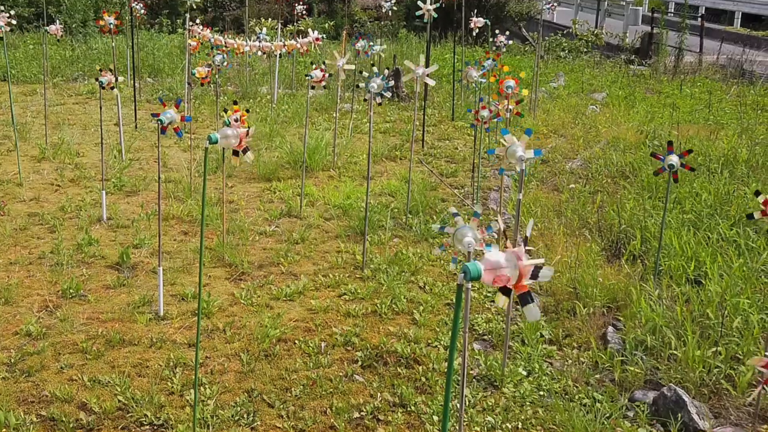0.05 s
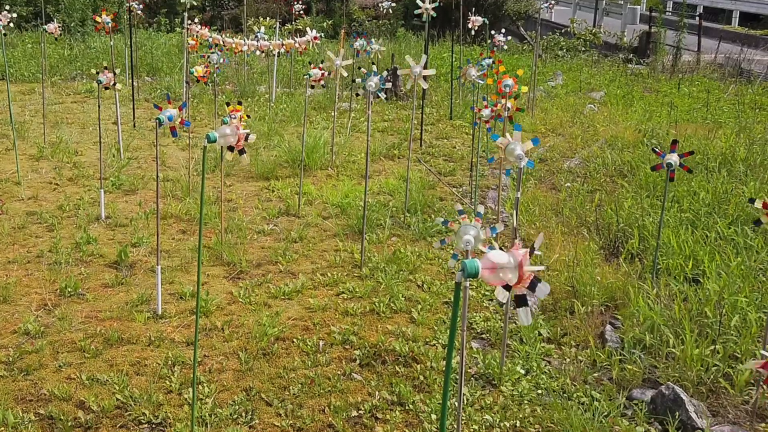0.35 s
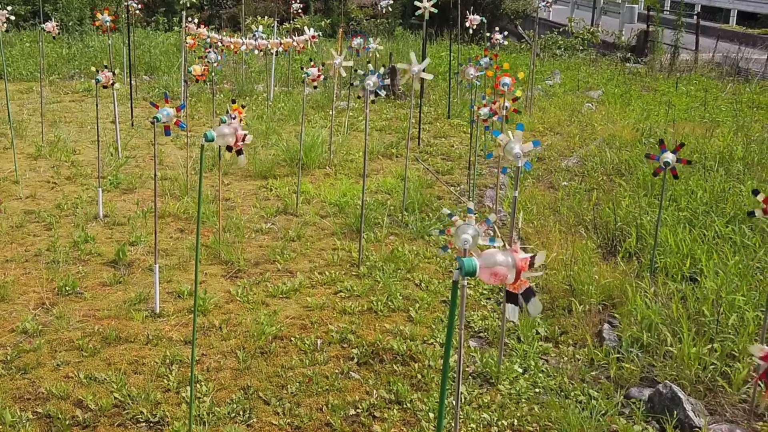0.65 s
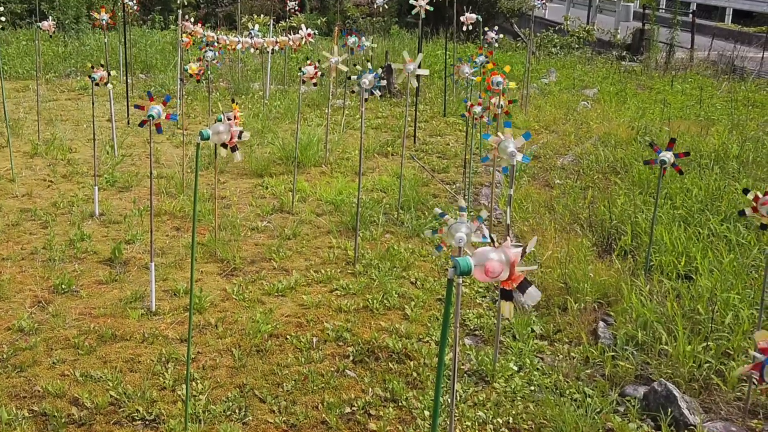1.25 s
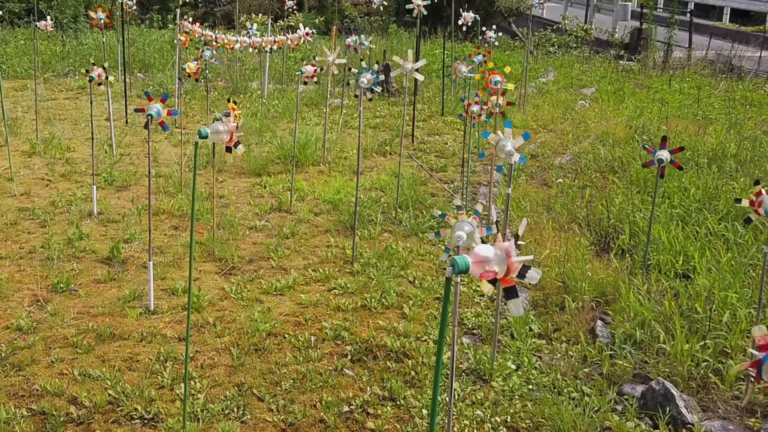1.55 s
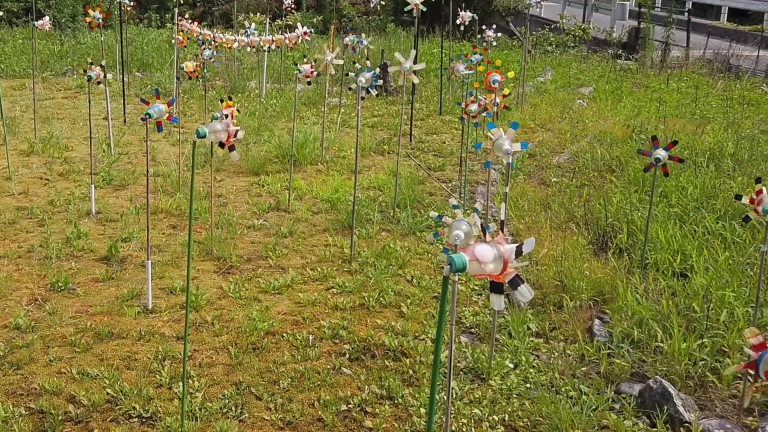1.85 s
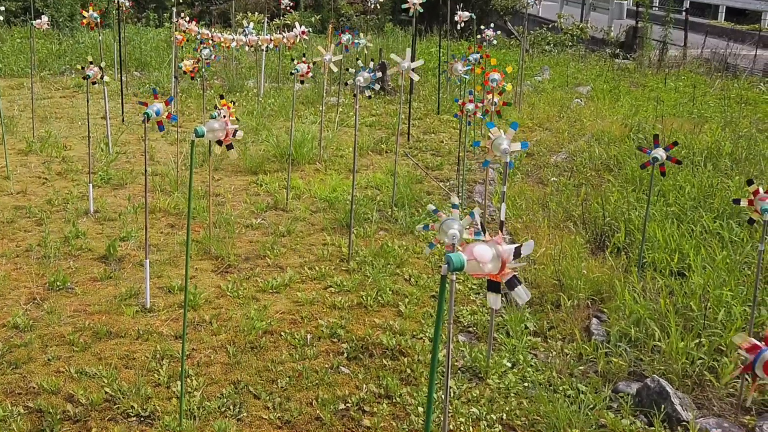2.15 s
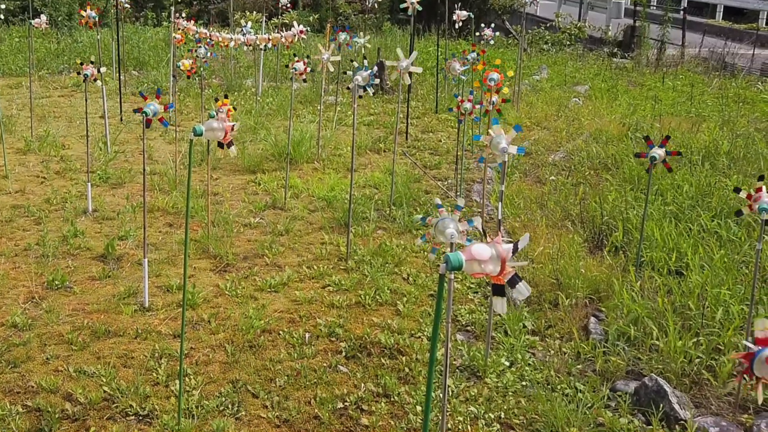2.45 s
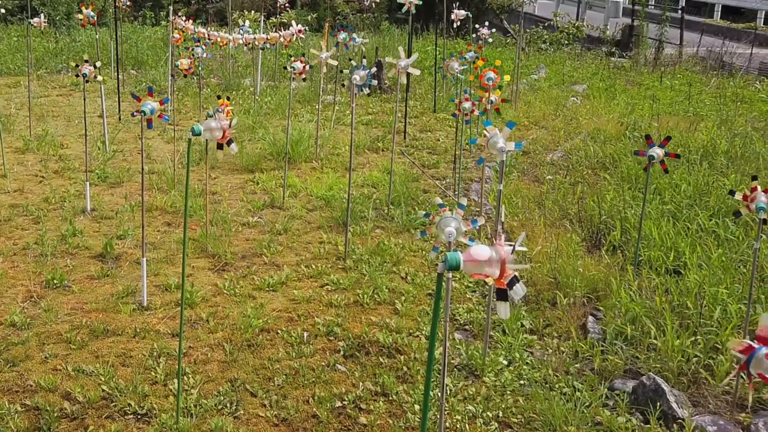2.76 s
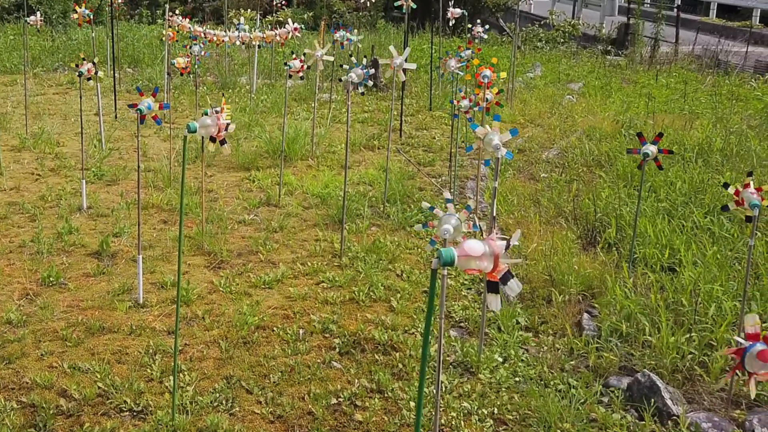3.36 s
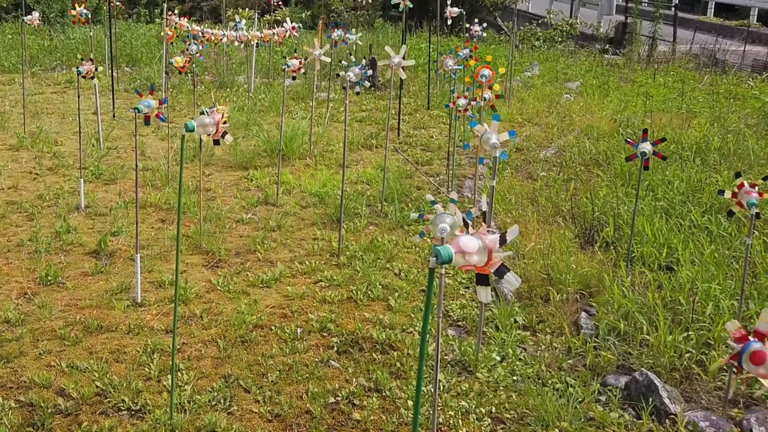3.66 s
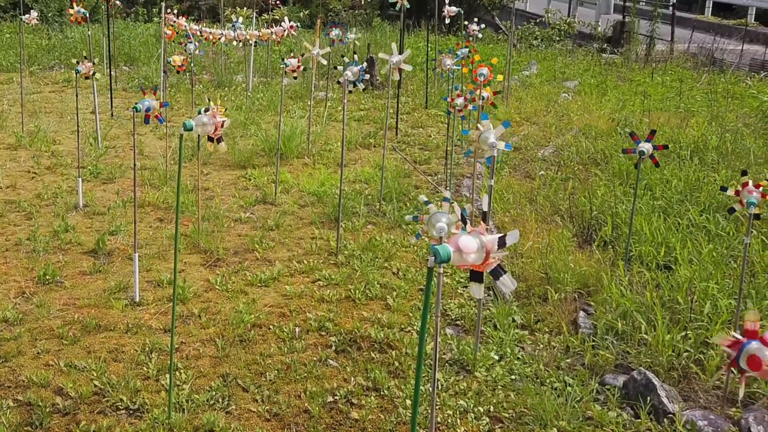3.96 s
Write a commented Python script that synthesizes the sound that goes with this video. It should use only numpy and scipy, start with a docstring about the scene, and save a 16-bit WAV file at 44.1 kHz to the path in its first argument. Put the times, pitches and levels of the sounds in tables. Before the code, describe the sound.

A plastic pinwheel squeaks close by, its dry hub giving short, irregular chirps and light knocks. Farther wheels tick and rustle across an open field, insects shrill steadily, and soft gusts rumble on the microphone.

```python
"""A plastic pinwheel turns in a light wind in an open field. Its dry hub knocks on its pin, then sticks
and slips, chirping low or squealing higher and breaking into the octave. Farther wheels tick, peep and
rustle, insects shrill in the grass, a low hum comes and goes, and gusts buffet the microphone."""
import sys
import numpy as np
from scipy import signal
from scipy.fft import rfft, irfft
from scipy.io import wavfile
from scipy.ndimage import uniform_filter1d

SR = 44100
rng = np.random.default_rng(int(sys.argv[2]) if len(sys.argv) > 2 else 0)


def store_wav(level_fs):
    """Save 16-bit WAV to argv[1]."""
    pcm = np.round(np.clip(np.atleast_2d(level_fs), -1, 1) * 32767)
    wavfile.write(sys.argv[1], SR, pcm.T.astype(np.int16))


N = 176400
TIME, FREQS = np.arange(N) / SR, np.fft.rfftfreq(N, 1 / SR)


def amp(db):
    return 10 ** (np.asarray(db) / 20)


def unit_rms(x):
    return x / np.sqrt(np.mean(x ** 2) + 1e-20)


def automation(points):
    """A fader ride: straight lines between points in time."""
    return np.interp(TIME, *np.transpose(points))


def over_spectrum(points):
    """Points joined on a log-frequency axis."""
    hz, value = np.transpose(points)
    return np.interp(np.log(FREQS + 1), np.log(hz), value)


def place(mix, start_s, sound):
    part = mix[max(round(start_s * SR), 0):][:len(sound)]
    part += sound[:len(part)]


def wander(rate_hz):
    """Smooth random modulation, rolling off above rate_hz."""
    return unit_rms(irfft(rfft(rng.standard_normal(N)) * np.exp(-(FREQS / rate_hz) ** 2), N))


# likeness of left and right: freq_hz, coherence
STEREO_IMAGE = [(30, 0.51), (120, 0.81), (250, 1), (500, 0.93), (1000, 1), (2000, 0.49), (4000, 0.036),
                (8000, 0.038), (15000, 0.067)]
def widen(mid, side):
    """Two channels, alike in the low mids and unrelated in the treble."""
    coherence = np.clip(over_spectrum(STEREO_IMAGE), -1, 1)
    mid = rfft(mid) * np.sqrt((1 + coherence) / 2)
    side = rfft(side) * np.sqrt((1 - coherence) / 2)
    return irfft(np.array([mid + side, mid - side]), N)


def noise_bed(colour, patchy_db):
    """Coloured stereo noise whose bands drift in level by about patchy_db."""
    bands = signal.stft(rng.standard_normal((2, N)), SR, nperseg=512)[2]
    patches = uniform_filter1d(rng.standard_normal(bands.shape[1:]), size=5, axis=0)
    patches = unit_rms(uniform_filter1d(patches, size=9, axis=1))
    white = signal.istft(bands * amp(patchy_db * patches), SR)[1][:, :N]
    coloured = irfft(rfft(white) * amp(over_spectrum(colour)), N)
    return unit_rms(widen(*coloured))


# colour of the open air: freq_hz, gain_db
AIR_EQ = [(20, 4), (60, -1), (150, -8), (300, -6.5), (420, -8), (560, -10.5), (780, -1), (1000, -0.5),
          (1300, -8.5), (1700, -8.5), (2600, -15.5), (5000, -23), (15000, -40)]
def air():
    """A soft, steady wash under everything."""
    return amp(-49) * noise_bed(AIR_EQ, patchy_db=1.4)


# swells of the hum: start_s, end_s, pitch_hz, level_db
HUM_SWELLS = [(0, 0.717, 118, -42.5), (0, 0.722, 233.5, -49.5), (2.398, 3.907, 118.2, -48),
              (3.404, 4.3, 60.9, -50.5)]
def hum(waver=.0051, flutter_db=3.8):
    """A low, slightly wavering hum swells and fades."""
    out = np.zeros(N)
    for start, end, hz, db in HUM_SWELLS:
        swell = np.sin(np.pi * np.clip((TIME - start) / (end - start), 0, 1))
        gain = amp(db + flutter_db * wander(14))
        pitch_hz = hz * (1 + waver * wander(4.05))
        out += gain * swell * np.sin(2 * np.pi * np.cumsum(pitch_hz) / SR)
    return out


# colours of the chorus and of its thin top: freq_hz, gain_db
CHORUS_EQ = [(4800, -27), (5900, -7), (6700, -9.5), (7500, -1.5), (8400, 3), (9200, -1.5), (9900, -9),
             (10700, -30), (12000, -38)]
SIZZLE_EQ = [(10000, -25), (12000, -1), (14200, 1), (15000, -2), (15400, -3)]
# fader rides for those two: time_s, gain_db
CHORUS_RIDE = [(0.0, -49.5), (1.15, -48), (2.2, -48.5), (4.0, -49.5)]
SIZZLE_RIDE = [(0, -78), (1.8, -72), (2.8, -62.5), (4, -61)]
# single insects holding a note: start_s, end_s, pitch_hz, width_hz, level_db
INSECT_NOTES = [(.22, 1.6, 8912, 20, -55), (.2, 1.4, 9358, 35, -60.5), (.6, 1.55, 9690, 20, -64.5),
                (.6, 1.55, 9810, 20, -63), (-.3, 2.1, 6070, 110, -62.5), (2.5, 3.72, 5814, 20, -62.5),
                (3.35, 4.2, 7850, 200, -58), (2.3, 4.3, 14080, 100, -78)]
def insects(sag_hz_per_s=60, fade_s=.15, flutter_db=3.5):
    """A shrill chorus in the grass sinks slowly in pitch, with fluttering held notes and a thin sizzle."""
    chorus = amp(3 + automation(CHORUS_RIDE)) * noise_bed(CHORUS_EQ, patchy_db=1.8)
    sag_phase = -np.pi * sag_hz_per_s * (TIME - TIME.mean()) ** 2
    out = (signal.hilbert(chorus) * np.exp(1j * sag_phase)).real
    for start, end, hz, width, db in INSECT_NOTES:
        swell = np.clip(np.minimum(TIME - start, end - TIME) / fade_s, 0, 1)
        phase = 2 * np.pi * np.cumsum(hz + width / 2 * wander(width)) / SR
        for side, wave in zip(out, (np.sin, np.cos)):  # left and right a quarter cycle apart
            side += amp(db) * swell * unit_rms(amp(flutter_db * wander(width)) * wave(phase))
    return out + amp(automation(SIZZLE_RIDE)) * noise_bed(SIZZLE_EQ, patchy_db=2.5)


# colours of the deep rumble and the buffeting above it: freq_hz, gain_db
RUMBLE_EQ = [(8, -7), (22, -4.5), (35, 8.5), (62, 1), (90, -8), (130, -13.5), (220, -36), (500, -56.5)]
BUFFET_EQ = [(40, -24.5), (90, 3), (130, 0), (190, -6), (260, -12), (380, -21.5), (700, -33.5), (2000, -41)]
# push of the wind: time_s, gain_db
GUST_RIDE = [(0, -49.5), (.3, -45.5), (.44, -38.5), (.52, -66), (.61, -49), (.72, -42), (.9, -39.5),
             (1.1, -39.5), (1.44, -39.5), (1.57, -53.5), (1.84, -44), (2.12, -40.5), (2.27, -40.5),
             (2.5, -57.5), (2.88, -46.5), (3.2, -53.5), (3.6, -67), (4, -57)]
# thumps of single eddies: centre_s, peak_db, pitch_hz
EDDY_THUMPS = [(0.267, -22, 58.4), (0.379, -21.5, 85), (0.409, -22, 142), (0.442, -25, 123),
               (0.711, -24, 137), (0.753, -25, 59), (0.944, -31, 44.5), (1.051, -22, 70),
               (1.109, -28, 68.5), (1.246, -28, 151), (1.355, -25, 60), (1.394, -24, 93), (1.895, -22, 39),
               (2.021, -24, 44.7), (2.048, -23, 136.5), (2.101, -23.5, 51), (2.14, -27.5, 150),
               (2.18, -31.5, 125), (2.956, -28, 62.6), (3.301, -30.5, 48)]
def wind_on_mic(thump_cycles=.56, skew_rad=.6, puff_s=.015, puff_ref_hz=154, lumps_db=3.5, width=.6):
    """Gusts rumble and buffet on the microphone; eddies thump each side a little differently."""
    rumble = noise_bed(RUMBLE_EQ, patchy_db=-.5)
    rumble /= np.sqrt(uniform_filter1d((rumble ** 2).mean(0), size=3000) + .013)  # even out its swells
    push_db = automation(GUST_RIDE)
    out = amp(5 + push_db) * rumble
    buffet_gain = amp(-9 + .98 * push_db + lumps_db * wander(5.8))
    for centre, db, hz in EDDY_THUMPS:
        cycles = np.arange(-3, 3, hz / SR)
        phase = 2 * np.pi * (cycles + rng.random())
        envelope = np.hanning(len(cycles)) / (1 + (cycles / thump_cycles) ** 2)
        for side, skew in zip(out, rng.permutation([-skew_rad, skew_rad])):
            place(side, centre + cycles[0] / hz, amp(db) * np.cos(phase + skew) * envelope)
        # each eddy drags a puff of turbulence, stronger behind the small fast ones
        buffet_gain += amp(db - 9) * (hz / puff_ref_hz) ** 3 * np.exp(-abs(TIME - centre) / puff_s)
    shared, apart = (noise_bed(BUFFET_EQ, patchy_db=0) for _ in range(2))
    return out + buffet_gain * unit_rms(shared + width * apart * [[1], [-1]])


def ground_scatter(sound, wet_db=-13, t60_s=.13):
    """Faint, short echoes off the ground and the other wheels, different at each ear."""
    t = np.arange(SR // 3) / SR
    taps = rng.standard_normal((2, len(t))) * (rng.random((2, len(t))) < .05) * amp(-60 * t / t60_s)
    echoes = signal.fftconvolve(sound[None], taps / np.linalg.norm(taps[0]), axes=1)[:, :N]
    return sound + amp(wet_db) * echoes


# resonances of a plastic wheel: freq_hz, gain_db, t60_s
WHEEL_MODES = [(1040, -10, .025), (1310, -7, .028), (1500, -7, .03), (1640, -.5, .05), (1830, -12, .025),
               (2340, -13, .018), (3010, -17, .014), (3330, -17, .014), (4600, -26, .01)]
def wheel_tap(tuning, contact_s=.003):
    """A plastic wheel rings after a tap; tuning multiplies every mode's frequency."""
    t = np.arange(SR // 20) / SR
    ring = sum(amp(db - 60 * t / t60) * np.sin(2 * np.pi * (hz * tuning * t + rng.random()))
               for hz, db, t60 in WHEEL_MODES)
    return np.minimum(t / contact_s, 1) * ring


def stick_slip(notes, scrape_rad=.12, scrape_hz=450):
    """Friction locks onto a wheel mode: short, unsteady tones, with one level given per harmonic."""
    attack_s, release_s = .005, .007
    bend, bend_s = .022, .009  # each slip starts sharp, then settles
    scrape = scrape_rad * wander(scrape_hz)
    waver = .006 * wander(70)
    flutter = amp(1.8 * wander(160))
    out = np.zeros(N)
    for start, length, hz, *harmonics_db in notes:
        t = np.arange(0, length + 4 * release_s, 1 / SR)
        span = (round(start * SR) + np.arange(len(t))) % N
        pitch_hz = hz * (1 + bend * np.exp(-t / bend_s) + waver[span])
        phase = 2 * np.pi * np.cumsum(pitch_hz) / SR + scrape[span]
        tone = sum(amp(db) * np.sin(k * phase) for k, db in enumerate(harmonics_db, 1))
        attack = np.sin(np.pi / 2 * np.minimum(t / attack_s, 1))
        release = np.exp(-np.maximum(t - length + release_s / 2, 0) * 2 / release_s)
        place(out, start, attack * release * flutter[span] * tone)
    return out


# colour of the rustling vanes: freq_hz, gain_db
VANE_EQ = [(700, -22), (1250, -12.5), (1600, -7.5), (2050, 0.5), (2700, -6.5), (3400, -6.5), (4800, -12),
           (6500, -8), (11000, -14), (12200, -22), (14300, -21), (15600, -24)]
# fader ride for the far wheels: time_s, gain_db
BREEZE_RIDE = [(0, 1.5), (1.4, 1.5), (2.2, 0.5), (3, -2), (4, -1.5)]
def far_wheels(count=8, ticks_per_s=180, spread_db=3):
    """Other wheels tick at random over the rustle of their vanes."""
    groups = np.zeros((2, N))
    for k, tuning in enumerate(np.linspace(.9, 1.3, count)):
        hits = rng.random(N) < ticks_per_s / count / SR
        accents = amp(spread_db * np.minimum(rng.exponential(1, N), 3))
        groups[k % 2] += signal.oaconvolve(hits * accents, wheel_tap(tuning))[:N]
    ticks = amp(-56) * unit_rms(widen(*groups))
    rustle = amp(-49) * noise_bed(VANE_EQ, patchy_db=3)
    return amp(automation(BREEZE_RIDE)) * (ticks + rustle)


# thin, high peeps: start_s, length_s, pitch_hz, level_db
FAR_PEEPS = [(.838, 0.014, 3690, -50), (1.055, .03, 5700, -50), (1.082, .014, 4460, -48),
             (1.555, 0.026, 5650, -44.5), (2.352, 0.017, 4470, -53)]
def far_hubs():
    """Farther hubs catch briefly and peep without overtones."""
    return stick_slip(FAR_PEEPS)


# bright squeals: start_s, length_s, pitch_hz, fundamental_gain_db, octave_gain_db
HUB_SQUEALS = [(0.101, 0.02, 1905, -44, -42.5), (0.307, 0.036, 1960, -43, -68),
               (0.335, 0.011, 1890, -56, -49), (1.384, 0.017, 1985, -43.5, -54),
               (1.403, 0.014, 1980, -43, -42.5), (1.417, 0.016, 2017, -39, -61),
               (1.703, 0.038, 1917, -42, -49), (1.737, 0.031, 1958, -42.5, -45.5),
               (1.787, 0.018, 2040, -45, -52), (2.063, 0.017, 1930, -39.5, -55),
               (2.084, 0.032, 1946, -40, -55), (2.123, 0.034, 1934, -41.5, -42.5),
               (2.52, 0.024, 1985, -47.5, -56), (2.591, 0.038, 1958, -47.5, -46),
               (3.104, 0.019, 1960, -47.5, -59), (3.222, 0.019, 2020, -47, -57),
               (3.314, 0.019, 1955, -48, -56), (3.826, 0.054, 1853, -53.5, -64)]
# low, rough chirps: start_s, length_s, pitch_hz, gain_db
HUB_CHIRPS = [(0.031, 0.012, 1690, -35.5), (0.237, 0.009, 1606, -38.5), (0.453, 0.013, 1627, -44),
              (0.696, 0.026, 1620, -34.5), (0.756, 0.009, 1600, -42), (0.939, 0.023, 1630, -35.5),
              (0.971, 0.092, 1563, -46), (1.188, 0.022, 1665, -38.5), (1.692, 0.019, 1653, -39),
              (1.954, 0.008, 1644, -33.5), (1.977, 0.022, 1614, -42), (2.49, 0.014, 1605, -39),
              (2.533, 0.017, 1590, -43), (2.811, 0.018, 1600, -43), (2.849, 0.022, 1624, -38),
              (3.154, 0.0072, 1675, -36), (3.518, 0.019, 1598, -40), (3.856, 0.013, 1606, -43.5)]
# knocks on the pin: start_s, gain_db
HUB_KNOCKS = [(0.4324, -40), (0.6853, -32), (0.9313, -40), (1.1813, -36), (1.436, -38.5), (1.6858, -37),
              (1.704, -49), (1.943, -37.5), (2.2048, -37), (2.81, -47)]
def near_pinwheel(squeal_trim_db=1, chirp_trim_db=-1.5, knock_trim_db=3, bounce_s=.035):
    """The dry hub squeals, chirps when it catches less cleanly, and knocks and bounces on its pin."""
    squeals = [(*row, row[-1] - 17) for row in HUB_SQUEALS]  # third harmonic, 17 dB under the octave
    chirps = [(*row, row[-1] - 25) for row in HUB_CHIRPS]  # a faint octave
    out = amp(squeal_trim_db) * stick_slip(squeals)
    out += amp(chirp_trim_db) * stick_slip(chirps, scrape_rad=.33, scrape_hz=260)
    for start, db in HUB_KNOCKS:
        gain = amp(db + knock_trim_db)
        place(out, start, gain * wheel_tap(tuning=rng.uniform(.91, 1.02)))
        rebound = start + bounce_s * rng.uniform(.31, 1.5)
        place(out, rebound, gain * amp(-9) * wheel_tap(tuning=.7))
    return out


def scene(lag_samples=2):
    """The field reaches the right channel just after the left; hum and wind lie on top."""
    hubs = ground_scatter(near_pinwheel() + far_hubs())
    left, right = hubs + far_wheels() + insects() + air()
    return np.array([left, np.roll(right, lag_samples)]) + hum() + wind_on_mic()


def record(dry, cutoff_hz=15650):
    """A steep low-pass trims the very top."""
    lowpass = signal.firwin(511, cutoff_hz, window=("kaiser", 9), fs=SR)
    return signal.oaconvolve(dry, lowpass[None], "same")


dry = scene()
out = record(dry)
store_wav(out)
```